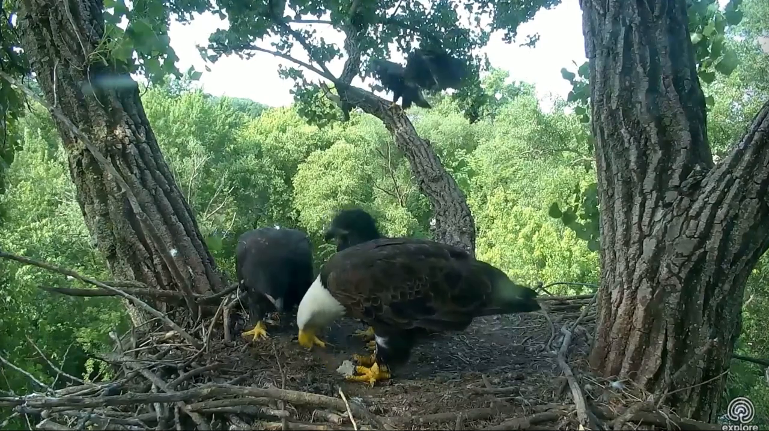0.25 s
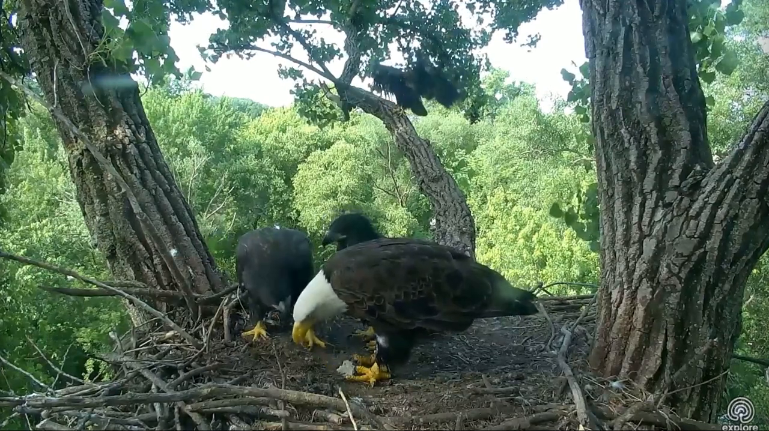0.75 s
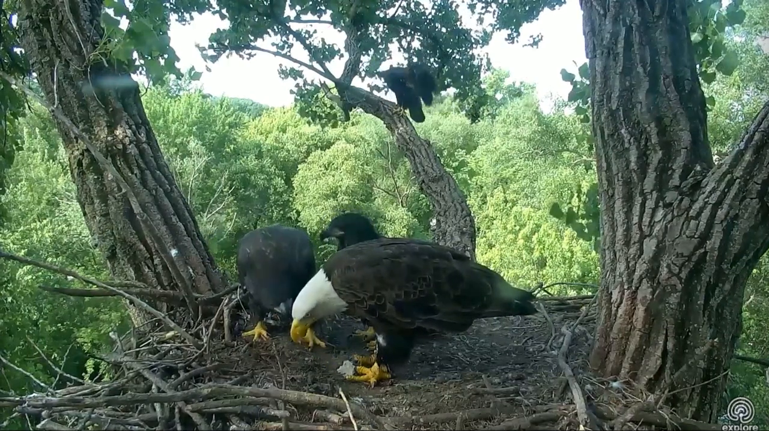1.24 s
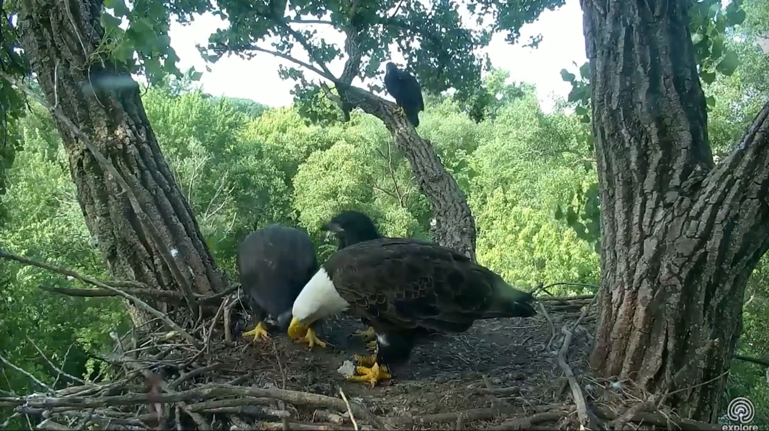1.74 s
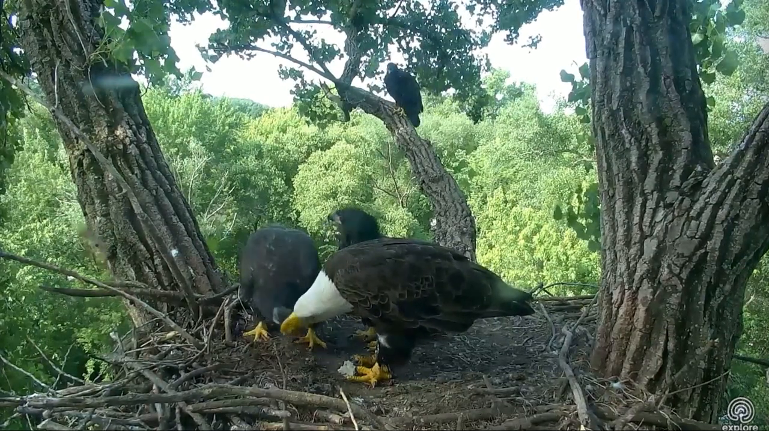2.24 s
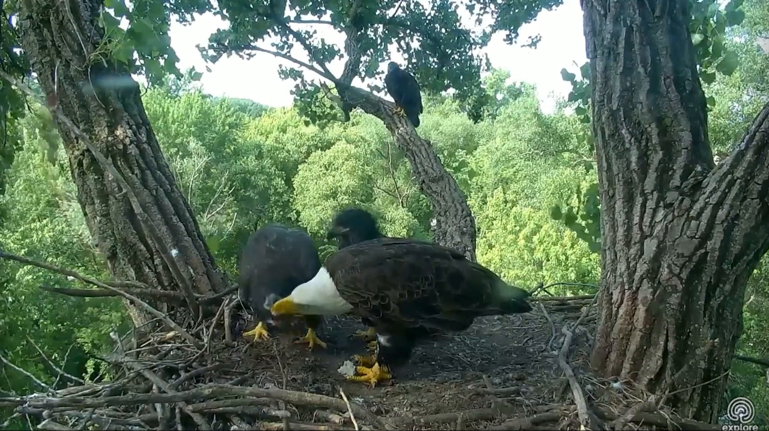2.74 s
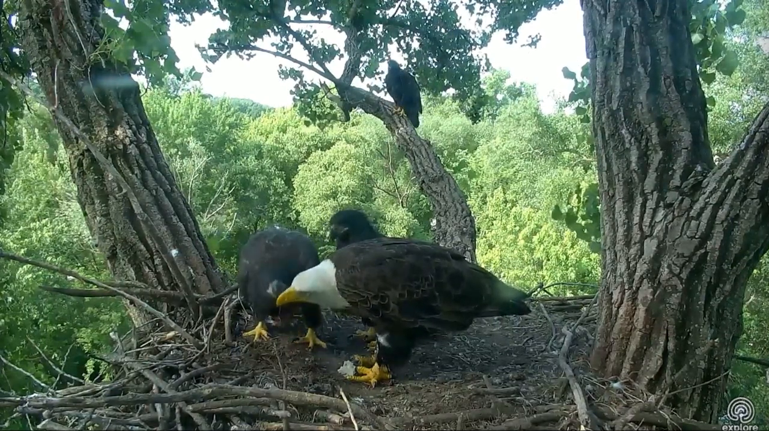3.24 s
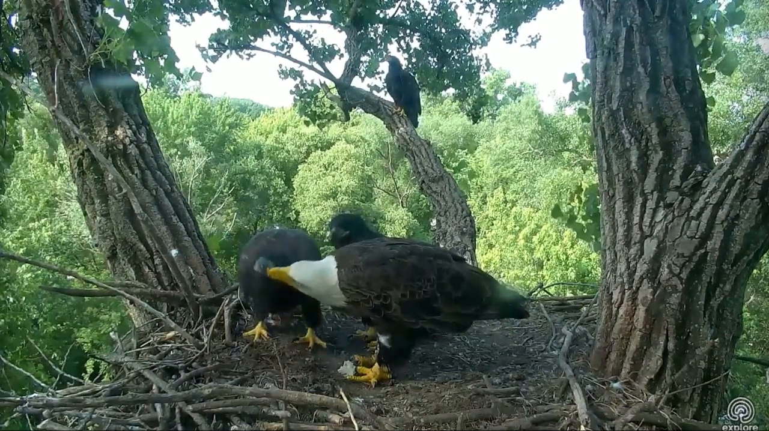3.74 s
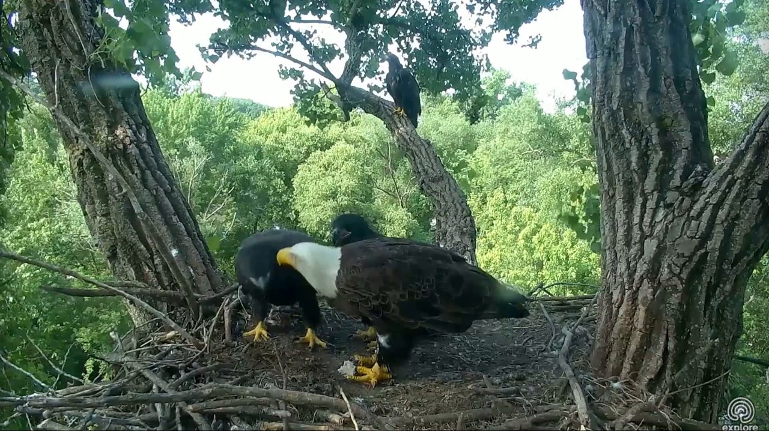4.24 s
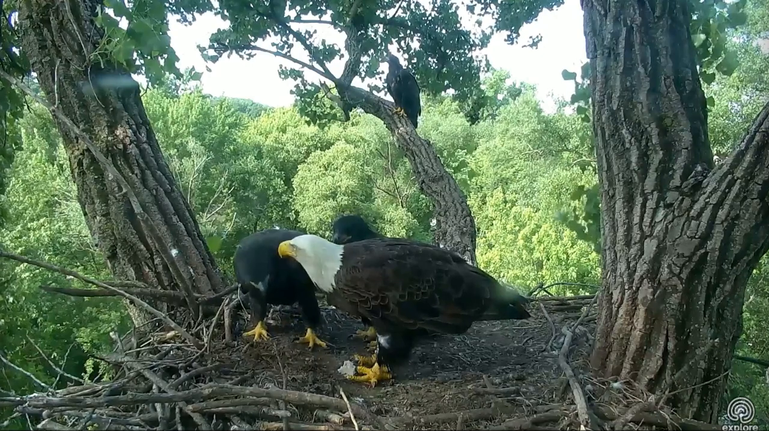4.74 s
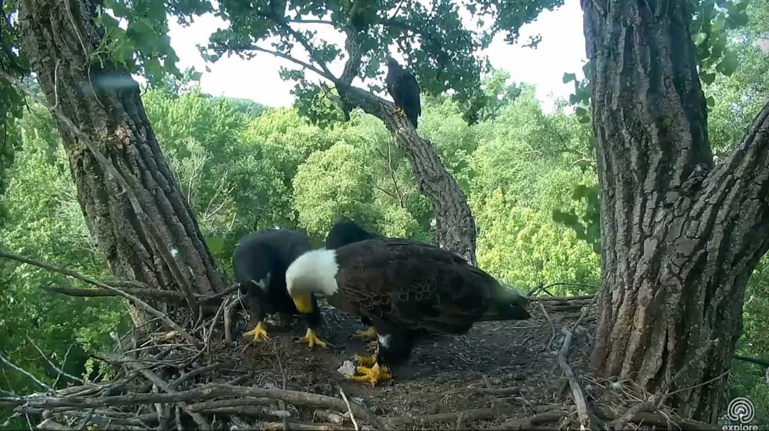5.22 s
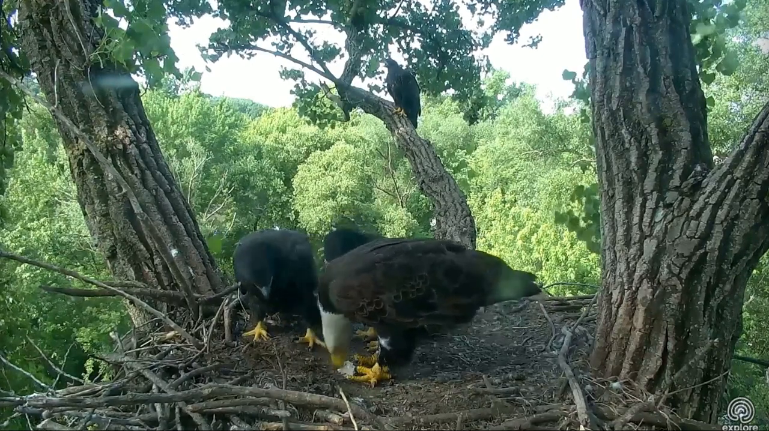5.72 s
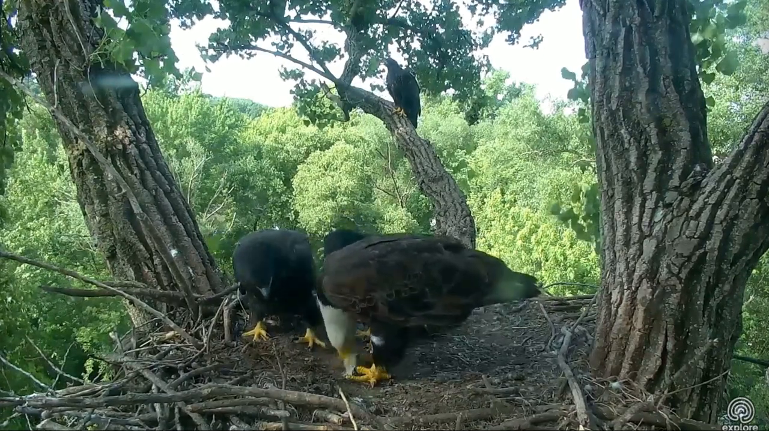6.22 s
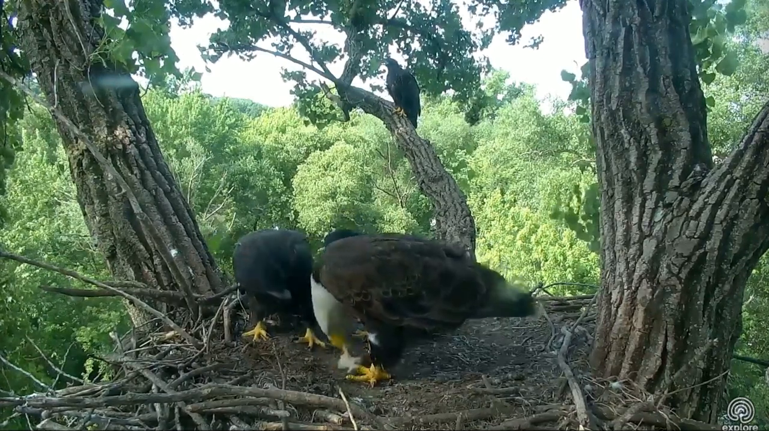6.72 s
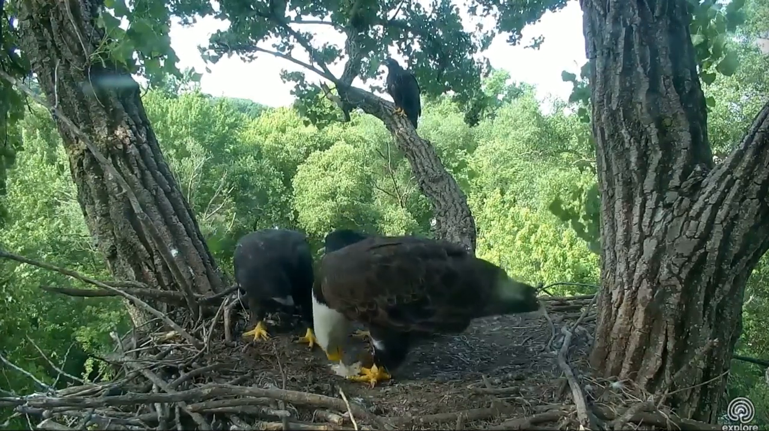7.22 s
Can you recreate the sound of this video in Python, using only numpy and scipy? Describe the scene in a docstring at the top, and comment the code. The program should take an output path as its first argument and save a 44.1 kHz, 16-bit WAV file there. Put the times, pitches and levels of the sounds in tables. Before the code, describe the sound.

At an outdoor tree nest, a few dry ticks and clipped chirps open the scene, then eaglets beg in gliding, trembling squeals that roughen into rasp. A thinner, higher voice whines over the louder one. The calling is strongest around the middle, then breaks into shorter bursts. A dove coos softly far away. A small fixed microphone gives steady leafy hiss, a boxy ring and gritty, metallic treble.

```python
"""A tree nest in a forest: young eagles beg for food in gliding squeals that break into rasps.
The squeals are shaking whistles crossfaded into noise; a second, thinner voice whines over them.
A dove coos far off in pure tones, twigs tick as bursts of noise, and filtered noise makes the forest hiss.
The nest camera's microphone housing rings near 1.6 kHz under the hiss, the ticks and the rasp.
The camera's 8 kHz sampling mirrors the sound into the treble."""
import sys
import numpy as np
from scipy import signal
from scipy.fft import rfft, irfft, next_fast_len
from scipy.io import wavfile

SR = 44100
rng = np.random.default_rng(int(sys.argv[2]) if len(sys.argv) > 2 else 0)


def waveform_to_disk(signal):
    """Save audio, clipped to [-1, 1], as 16-bit WAV at the path in sys.argv[1]."""
    frames = np.transpose(np.atleast_2d(signal))
    scaled = np.clip(frames, -1, 1) * 32767
    samples = np.round(scaled).astype(np.int16)
    wavfile.write(sys.argv[1], SR, samples)


N = 329427  # length in samples, about 7.5 s


def from_db(db):
    """Decibels to gain."""
    return 10 ** (np.asarray(db) / 20)


def rms_one(x):
    """Scale to unit power."""
    return x / np.sqrt(np.mean(np.abs(x) ** 2) + 1e-20)


def read(rows, t):
    """Every column of a curve at the times t."""
    s, *columns = np.transpose(rows)
    return [np.interp(t, s, column) for column in columns]


def samples(start_s, length_s):
    """Sample indices of a sound and its age in seconds at each."""
    first = max(int(start_s * SR), 0)
    last = min(int((start_s + length_s) * SR), N)
    at = np.arange(first, last)
    return at, (at - at[0]) / SR


def span(rows, fade_s):
    """Samples, times and a soft-edged gate for one curve."""
    first = max(int(rows[0][0] * SR), 0)
    last = min(int(rows[-1][0] * SR), N)
    at = np.arange(first, last)
    t = at / SR
    return at, t, np.clip(np.minimum(t - t[0], t[-1] - t) / fade_s, 0, 1)


def note(start_s, attack_s, held_s, fade_db_per_s):
    """Samples, age and gain of a note that swells, holds and dies away."""
    at, age = samples(start_s, held_s + 40 / fade_db_per_s)  # cut once it has faded by 40 dB
    fade = from_db(-fade_db_per_s * np.maximum(age - held_s, 0))
    return at, age, np.minimum(age / attack_s, 1) * fade


def colour(x, points):
    """Filter by a (Hz, dB) curve, interpolated over log frequency."""
    hz, db = np.transpose(points)
    size = next_fast_len(N)
    bins = np.maximum(np.arange(size // 2 + 1) * SR / size, 1)
    gain = from_db(np.interp(np.log(bins), np.log(hz), db))
    return irfft(rfft(x, size) * gain, size)[:N]


def wander(rate_hz):
    """Random motion up to the given rate, spread 1."""
    lowpass = signal.butter(2, rate_hz, fs=SR, output="sos")
    return rms_one(signal.sosfilt(lowpass, rng.standard_normal(N)))


def phase_of(hz):
    """Running phase of a moving frequency."""
    return 2 * np.pi * np.cumsum(hz) / SR


def resonance(x, hz, width_hz):
    """Two-pole resonance with gain 1 on top."""
    r = np.exp(-np.pi * width_hz / SR)
    numerator = np.array([1, 0, -1]) * (1 - r * r) / 2
    denominator = [1, -2 * r * np.cos(2 * np.pi * hz / SR), r * r]
    return signal.lfilter(numerator, denominator, x)


HOUSING_HZ, HOUSING_WIDTH_HZ, HOUSING_DB = 1566, 220, 13.5


def housing(x):
    """Broadband sound sets the microphone housing ringing."""
    return x + from_db(HOUSING_DB) * resonance(x, HOUSING_HZ, HOUSING_WIDTH_HZ)


# loudness of the forest hiss, easing slightly: time_s [s], level_db [dB, before the trim]
HISS_LEVEL = [(0.0, -41), (2.9, -43), (7.47, -43.5)]
# tone of the forest hiss, before the housing rings: freq_hz [Hz], gain_db [dB]
HISS_SPECTRUM = [(25, -20), (70, -15.5), (110, -16.5), (300, -12), (600, -7), (1100, -9), (1800, -7),
                 (2400, -10), (3000, -12.5), (3500, -14), (3950, -23)]
# loudness of the far low drone, fading: time_s [s], level_db [dB]
DRONE_LEVEL = [(0, -68), (1.2, -76), (2.5, -83.5), (7.47, -91.5)]
DRONE_HZ, DRONE_WOBBLE_HZ = 70, 1.6


def forest(trim_db=-1.1, flutter_db=1.48):
    """Hiss of leaves, coloured noise with a slight flutter, over a faint far drone."""
    t = np.arange(N) / SR
    leaves = colour(rng.standard_normal(N), HISS_SPECTRUM + [(4300, -63.5)])
    hiss_gain = from_db(read(HISS_LEVEL, t)[0] + trim_db + flutter_db * wander(15))
    drone = np.sqrt(2) * np.sin(phase_of(DRONE_HZ + DRONE_WOBBLE_HZ * wander(15)))
    drone_gain = from_db(read(DRONE_LEVEL, t)[0])
    return hiss_gain * rms_one(housing(leaves)) + drone_gain * drone


# the dove's coos: start_s [s], held_s [s, attack included], fade_db_per_s [dB/s],
# pitch_hz [Hz, where the scoop aims], sag_hz_per_s [Hz/s], level_db [dB, before wavering]
COOS = [(0.67, 0.089, 900, 498, 3, -51), (0.75, .06, 45, 655.1, 321.5, -54.5),
        (1.44, 0.34, 79, 488, 65.5, -51), (2.67, 0.28, 330, 486, 63.5, -49),
        (3.421, 0.28, 96, 485, 68.5, -49.5)]
COO_ATTACK_S, COO_SCOOP_SHARE, COO_SCOOP_S = 0.076, .08, .035


def dove(waver_db=1):
    """Soft pure coos: each scoops up towards its pitch while it sags."""
    out, waver = np.zeros(N), wander(14)
    for start_s, held_s, fade_db_per_s, pitch_hz, sag_hz_per_s, level_db in COOS:
        at, age, envelope = note(start_s, COO_ATTACK_S, held_s, fade_db_per_s)
        scoop = 1 - COO_SCOOP_SHARE * np.exp(-age / COO_SCOOP_S)
        hz = pitch_hz * scoop - sag_hz_per_s * age
        gain = envelope * from_db(level_db + waver_db * waver[at])
        out[at] += gain * np.sqrt(2) * np.sin(phase_of(hz))
    return out


# ticks of twigs and beaks: start_s [s], level_db [dB, initial force before the trim]
TICKS = [(0.1745, -23), (0.2457, -32), (0.395, -40), (0.5722, -36), (1.8557, -32), (6.3498, -36)]


def twigs(decay_s=0.00072, trim_db=-4):
    """Each tick is a very short dry crackle that sets the housing ringing."""
    t, force = np.arange(N) / SR, np.zeros(N)
    for start_s, level_db in TICKS:
        force += from_db(level_db) * (t >= start_s) * np.exp(-np.abs(t - start_s) / decay_s)
    crackle = rms_one(resonance(rng.standard_normal(N), hz=1900, width_hz=1100))
    return from_db(trim_db) * housing(force * crackle)


def trees(x, t60_s=0.71, echo_db=-25):
    """Trunks and leaves scatter a weak, diffuse echo: a decaying noise tail."""
    t = np.arange(SR) / SR
    tail = rng.standard_normal(SR) * from_db(-60 * t / t60_s) * (t > .008)  # 8 ms before the first echo
    tail /= np.sqrt(np.sum(tail ** 2))
    return x + from_db(echo_db) * signal.fftconvolve(x, tail)[:N]


# an eaglet's nearly voiceless hiss between squeals: time_s [s], level_db [dB]
BREATH = [(4.85, -77), (4.92, -52), (5.08, -38), (5.11, -42.5), (5.16, -46), (5.3, -54), (5.5, -48.5),
          (5.79, -47.5), (5.84, -73)]


def hissing(hz=3200, width_hz=1300):
    """Air through the open beak: noise in one broad resonance."""
    out = np.zeros(N)
    at, t, gate = span(BREATH, fade_s=.02)
    air = rms_one(resonance(rng.standard_normal(len(at)), hz, width_hz))
    out[at] = gate * from_db(read(BREATH, t)[0]) * air
    return out


# a squeal starts this share below its pitch; a higher hold power keeps the level up longer in the drop
SCOOP_SHARE, SCOOP_S, SQUEAL_ATTACK_S = .26, .015, 0.0066
DROP_S, DROP_HOLD_POWER = .045, 3.5


def squeal(curve, drop_share):
    """A long call scoops up, follows its curve, drops and fades: samples, pitch, gain, further controls."""
    start_s, end_s = curve[0][0], curve[-1][0]
    at, age = samples(start_s, end_s - start_s + DROP_S)
    hz, level_db, *controls = read(curve, at / SR)
    drop = np.clip((at / SR - end_s) / DROP_S, 0, 1)
    scoop = 1 - SCOOP_SHARE * np.exp(-age / SCOOP_S)
    hz = hz * scoop * (1 - drop_share * drop)
    attack = np.minimum(age / SQUEAL_ATTACK_S, 1)
    gain = from_db(level_db) * attack * (1 - drop ** DROP_HOLD_POWER)
    return (at, hz, gain, *controls)


# the second, thinner voice, one curve per whine:
# time_s [s], pitch_hz [Hz, before scoop, drop and wavering], level_db [dB, before trim and shimmer]
WHINES = [
    [(2.42, 3510, -49), (2.5, 3550, -39.5), (2.57, 3430, -45), (2.66, 3414, -43), (2.77, 3560, -49),
     (2.87, 3430, -42.5), (3.1, 3540, -40.5), (3.23, 3475, -35.5), (3.33, 3540, -40)],
    [(4.277, 2150, -39), (4.31, 2800, -39.5), (4.332, 3400, -35), (4.4, 3410, -41), (4.5, 3434, -38),
     (4.66, 3505, -42.5), (4.78, 3620, -44), (4.98, 3466, -46), (5.07, 3623, -50.5)],
    [(5.4, 3701, -63), (5.79, 3980, -54.5)],
    [(6.43, 3250, -49), (6.55, 3300, -47), (6.65, 3494, -46.5), (6.71, 3460, -48)],
    [(7.1, 3650, -47), (7.15, 3610, -34.5), (7.2, 3660, -36.5), (7.25, 3690, -38)],
]


def thin_eaglet(jitter_hz=55, waver_hz=25, shimmer_db=1.5, trim_db=-1.0, hoarse_db=-5):
    """A high, wavering whistle wrapped in a narrow band of hoarseness."""
    out, shake, waver, shimmer = np.zeros(N), wander(300), wander(25), wander(130)
    hoarse = from_db(hoarse_db) * rms_one(wander(200) + 1j * wander(170))
    for curve in WHINES:
        at, hz, gain = squeal(curve, drop_share=.03)
        phase = phase_of(hz + jitter_hz * shake[at] + waver_hz * waver[at])
        voice = np.sqrt(2) * np.real((1 + hoarse[at]) * np.exp(1j * phase))
        out[at] += gain * from_db(trim_db + shimmer_db * shimmer[at]) * voice
    return out


REST_HZ = 1737  # pitch of the slack syrinx: a chirp sinks back towards it
CHIRP_ATTACK_S, CHIRP_STRAIN = .007, 0.064


def chirp(start_s, top_s, width_s, held_s, fade_db_per_s, top_hz, level_db):
    """One twitch of the syrinx bends the pitch from rest in an arch: samples, pitch, gain, strain."""
    at, age, envelope = note(start_s, CHIRP_ATTACK_S, held_s, fade_db_per_s)
    arch = 1 / (1 + ((age - top_s) / width_s) ** 2)
    hz = REST_HZ + (top_hz - REST_HZ) * arch
    return at, hz, from_db(level_db) * envelope, CHIRP_STRAIN


SPELL_FADE_S = 0.028


def spell(t, start_s, length_s):
    """1 during a spell of buzzing or doubling, 0 outside, with soft edges."""
    return np.clip(np.minimum(t - start_s, start_s + length_s - t) / SPELL_FADE_S, 0, 1)


# spells of buzzing: start_s [s], length_s [s], rate_hz [Hz, before it wobbles], depth [0-1]
BUZZES = [(1.918, 0.15, 450, 0.35), (2.167, 0.17, 1193, .8), (2.586, 0.34, 460, 0.99),
          (2.909, 0.1, 458, 0.47), (3.051, 0.3, 392.4, 0.63), (3.618, 0.3, 177, 0.31),
          (6.76, 0.19, 539, 0.33)]


def buzzing(t, phase, shimmer, lower_side=0.25):
    """A slower vibration of the syrinx adds a line on each side of the pitch, the upper one stronger."""
    lines = np.zeros(len(t))
    for start_s, length_s, rate_hz, depth in BUZZES:
        buzz = phase_of(rate_hz * (1 + 0.038 * shimmer))
        sides = np.sin(phase + buzz) + lower_side * np.sin(phase - buzz)
        lines += depth * spell(t, start_s, length_s) * sides
    return lines


DOUBLING_AT_S, DOUBLING_LENGTH_S, DOUBLING_DB = 6.14, 0.081, -14


def doubling(t, phase):
    """Once the voice doubles its period and gains a line at half its pitch."""
    return from_db(DOUBLING_DB) * spell(t, DOUBLING_AT_S, DOUBLING_LENGTH_S) * np.sin(phase / 2)


def rasp_spray():
    """The broad part of the rasp: noise in the squeal band that rings the housing."""
    band = [(400, -31.5), (1200, -25), (1800, -8.5), (2400, 5), (3200, 5), (3900, 0.0), (4300, -39.5)]
    return rms_one(housing(colour(rng.standard_normal(N), band)))


# the louder eaglet, one curve per squeal: time_s [s], pitch_hz [Hz, before scoop, drop and shaking],
# level_db [dB, before shimmer], strain [0 whistle - 1 rasp]
SQUEALS = [
    [(0.197, 3744, -34, 1), (0.22, 3550, -35, 0.7), (0.238, 3100, -44, 0.74)],
    [(1.867, 3250, -28.5, .07), (1.91, 3120, -31.5, .07), (1.95, 2830, -35, 0.24), (2.04, 3360, -35, .36),
     (2.115, 3380, -36.5, 0.2), (2.15, 3596, -34.5, .22), (2.21, 3598, -33.5, .45), (2.31, 3860, -33, .56),
     (2.436, 3880, -31.5, 0.64)],
    [(2.57, 2950, -54.5, 0.5), (2.63, 2760, -45.5, 0), (2.75, 2700, -44.5, 0.13), (2.86, 2755, -44.5, 0.5)],
    [(2.888, 2900, -37, .7), (2.935, 2968, -30.5, 0.03), (2.98, 2907, -32, .05), (3.04, 2980, -34.5, .18),
     (3.065, 3312, -35, 0.4), (3.13, 3190, -38, 0.53), (3.3, 3092, -35.5, 0.8), (3.33, 2720, -31, .3),
     (3.352, 3150, -38, 0.7), (3.4, 3414, -26.5, .18), (3.435, 3475, -39, 0.7), (3.462, 3610, -26, 0.31),
     (3.505, 3540, -27.5, 0.17), (3.53, 3227, -28.5, 0.11), (3.59, 3277, -33.5, 0.48),
     (3.635, 3590, -25, 0.05), (3.665, 3635, -40, 0.76)],
    [(3.672, 3900, -32, 0.5), (3.725, 3620, -30.5, .6), (3.765, 3310, -25, .7), (3.8, 3210, -34.5, 0.2),
     (3.85, 3450, -26, .45), (3.9, 3580, -26, 0.43), (3.922, 3600, -35.5, 0.8), (3.937, 3766, -23.5, 0.26),
     (3.97, 3617, -20, 0.22), (3.998, 3260, -19.5, .15), (4.014, 3150, -29.5, .5),
     (4.021, 2680, -27.5, 0.25)],
    [(4.297, 2424, -40, .3), (4.313, 2703, -28, 0.5), (4.331, 3275, -30.5, .33), (4.39, 2997, -30, .15),
     (4.425, 3220, -30.5, .3), (4.475, 3270, -39, 0.2), (4.527, 2740, -26, 0.03), (4.585, 2556, -31.5, .15),
     (4.615, 2217, -40, .12), (4.678, 2400, -33.5, 0.03), (4.705, 2660, -21, 0.2), (4.724, 2780, -18, 0),
     (4.745, 2498, -17.5, 0), (4.76, 2590, -25, .05), (4.768, 2793, -19.5, 0), (4.783, 2775, -20.5, 0.01),
     (4.795, 2910, -33.5, 0.2), (4.83, 2980, -41, 0.7), (4.86, 2780, -34, .25)],
    [(5.148, 2350, -37, 1), (5.166, 2750, -25.5, 0.3), (5.186, 3450, -25.5, 0.22),
     (5.215, 3038, -29.5, .12), (5.255, 3040, -26.5, 0.04), (5.278, 2735, -30.5, 0),
     (5.315, 3005, -26, 0.22), (5.37, 3120, -28, 0.1), (5.405, 2690, -34, .24), (5.432, 2740, -36.5, .1)],
    [(6.094, 2900, -45, 0.4), (6.115, 2660, -34, 0.1), (6.141, 2820, -25, 0.02), (6.153, 2900, -26, .22),
     (6.172, 3107, -29.5, 0.24), (6.19, 2817, -22.5, 0.05), (6.222, 2810, -24.5, 0.15),
     (6.227, 3226, -30, 0.5), (6.238, 3180, -41, .8), (6.272, 3240, -45.5, 0.3), (6.303, 2680, -30, .04),
     (6.315, 2560, -47.5, .2)],
    [(6.759, 3033, -37, 0.3), (6.795, 3090, -32, 0.14), (6.82, 2760, -27.5, 0.48),
     (6.842, 2610, -27.5, .22), (6.877, 2840, -38, 0.2), (6.928, 2680, -41, .45)],
    [(7.046, 3150, -41, 0.3), (7.062, 2850, -30.5, 0.2), (7.09, 3004, -37, 0.54),
     (7.138, 3030, -30.5, 0.75), (7.16, 2994, -35, 0.59), (7.21, 3225, -32.5, 0.44),
     (7.245, 3540, -40, 0.8), (7.27, 3290, -32, 0.41)],
]
# short chirps from either bird, each one arch of pitch: start_s [s], top_s [s after the start, may be
# negative], half_width_s [s], held_s [s, attack included], fade_db_per_s [dB/s],
# top_hz [Hz, before shaking], level_db [dB, before shimmer]
CHIRPS = [ (0.170, .008, .04, 0.0067, 2000, 1537, -24.5), (0.184, 0.039, 0.044, 0.013, 2005, 2770, -26),
          (0.247, -0.0074, 0.0413, .011, 423, 2393, -24.5), (0.826, .016, 0.064, 0.039, 701, 2610, -41.5),
          (0.946, 0.042, .04, .021, 1201, 2205, -27.5), (0.970, .018, 0.071, 0.027, 902, 2857, -28.5),
          (1.003, 0.028, 0.076, .046, 337, 2513, -30.5), (1.166, .011, .04, 0.015, 599.5, 2568, -48),
          (1.420, 0.031, 0.049, 0.071, 801, 2634, -31), (1.66, .14, 0.19, 0.044, 184, 3600, -49.5),
          (3.685, 0.0039, 0.0079, 0.014, 2497, 3110, -27.5), (4.893, 0.0079, .04, 0.039, 252, 3370, -43.5),
          (5.076, -0.0065, 0.022, .03, 2001, 3480, -33), (5.225, .065, .11, .032, 600, 3880, -43),
          (5.705, .02, 0.033, 0.032, 332, 2310, -29.5), (5.805, 0.00072, .017, .01, 1204, 3550, -38.5),
          (5.940, .016, 0.097, .021, 4000, 2238, -31), (6.057, .007, 0.021, 0.013, 1400, 2400, -42.5),
          (6.405, .007, 0.025, 0.015, 1697, 3900, -52.5), (7.141, -.002, 0.0109, 0.0094, 2202, 2877, -27.5),
          ]


def squeals_and_chirps(jitter_hz=5, strain_jitter_hz=120, waver_hz=14, strain_waver_hz=70,
                       shimmer_db=1.66, strain_shimmer_db=0.9, octave_db=-21, halo_db=-4, spray_db=-2.5):
    """A whistle that shakes, and gives its power over to rasp, as strain turns the syrinx chaotic."""
    out = np.zeros(N)
    shake, shimmer, waver = wander(300), wander(82), wander(45)
    halo, spray = rms_one(wander(550) + 1j * wander(380)), rasp_spray()
    calls = [squeal(curve, drop_share=.34) for curve in SQUEALS] + [chirp(*row) for row in CHIRPS]
    for at, hz, gain, strain in calls:
        t, strain = at / SR, np.clip(strain, 0, 1)
        slow_motion = (waver_hz + strain_waver_hz * strain) * waver[at]
        fast_motion = (jitter_hz + strain_jitter_hz * strain) * shake[at]
        phase = phase_of(hz + slow_motion + fast_motion)
        tone = np.sin(phase) + from_db(octave_db) * np.sin(2 * phase)
        tone += doubling(t, phase) + buzzing(t, phase, shimmer[at])
        tone *= np.sqrt(2) * from_db((shimmer_db + strain_shimmer_db * strain) * shimmer[at])
        # part of the rasp clings to the pitch, the rest is broad
        clinging = from_db(halo_db) * np.sqrt(2) * np.real(halo[at] * np.exp(1j * phase))
        rasp = clinging + from_db(spray_db) * spray[at]
        out[at] += gain * (np.sqrt(1 - strain ** 2) * tone + strain * rasp)
    return out


def scene():
    """Everything that reaches the one microphone; the nest sounds echo among the trees."""
    nest = twigs() + hissing() + thin_eaglet() + squeals_and_chirps()
    return (forest() + dove() + trees(nest))[None]


# what the camera's smoothing filter lets through: freq_hz [Hz], gain_db [dB]
SMOOTHING = [(3000, -0.5), (3800, -3), (4200, -6), (4500, -8), (5300, -17), (6000, -28.5), (6650, -42),
             (7100, -71.5), (9100, -76), (9600, -43.5), (10700, -31), (12000, -26), (13300, -35.5),
             (14200, -49), (14600, -67)]
CAMERA_RATE_HZ, BAND_HZ, CUTOFF_HZ = 8000, 4100, 14600


def record(dry):
    """Coarse sampling mirrors sound around multiples of the camera's rate; weak smoothing passes the images."""
    band = signal.sosfilt(signal.ellip(10, .1, 70, BAND_HZ, fs=SR, output="sos"), dry[0])
    clock = 2 * np.pi * CAMERA_RATE_HZ * np.arange(N) / SR
    sampled = band * (1 + 2 * np.cos(clock) + 2 * np.cos(2 * clock))
    smoothed = colour(sampled, SMOOTHING)
    return signal.sosfilt(signal.ellip(10, .1, 80, CUTOFF_HZ, fs=SR, output="sos"), smoothed)[None]


dry = scene()
out = record(dry)
waveform_to_disk(out)
```